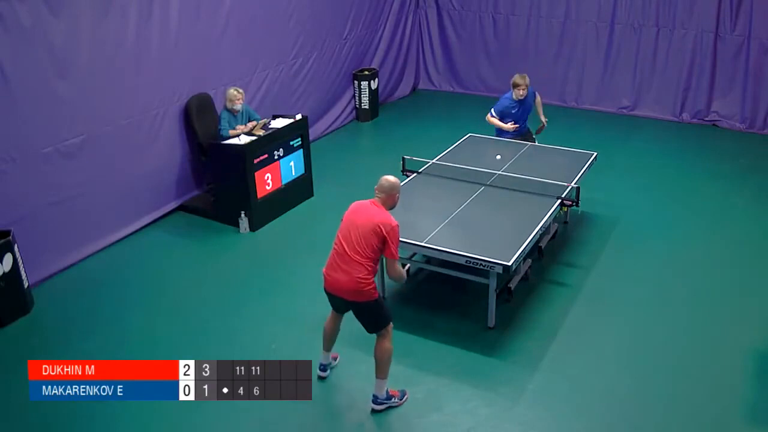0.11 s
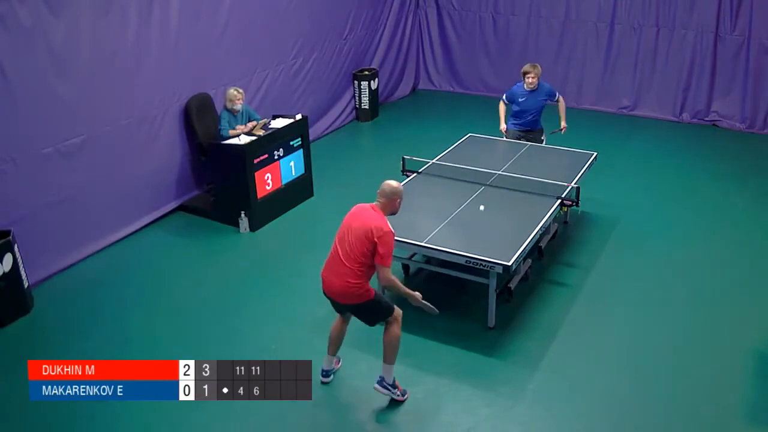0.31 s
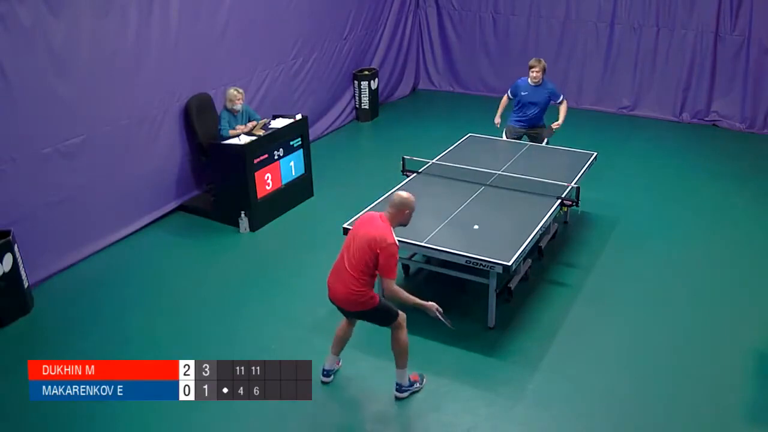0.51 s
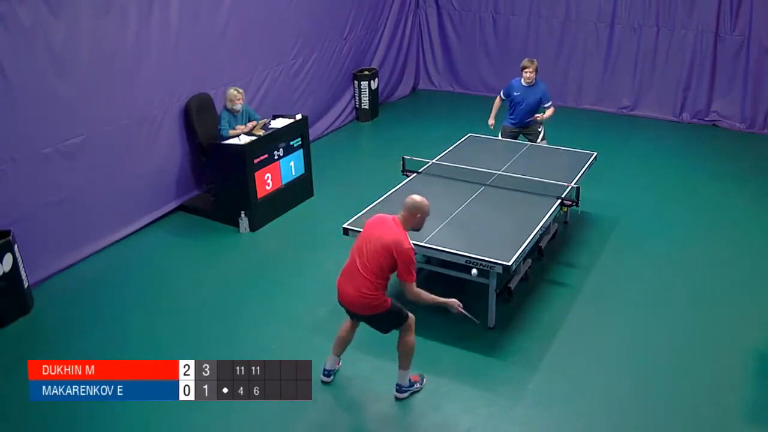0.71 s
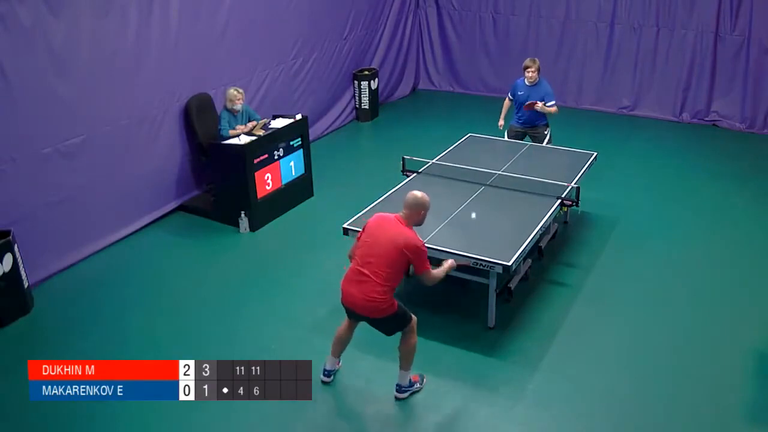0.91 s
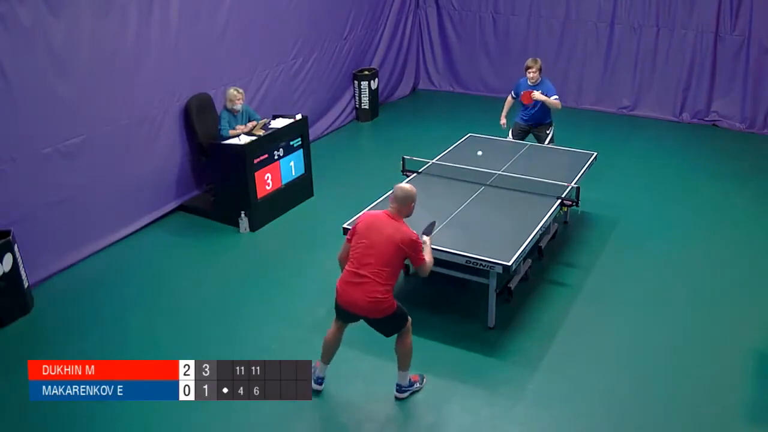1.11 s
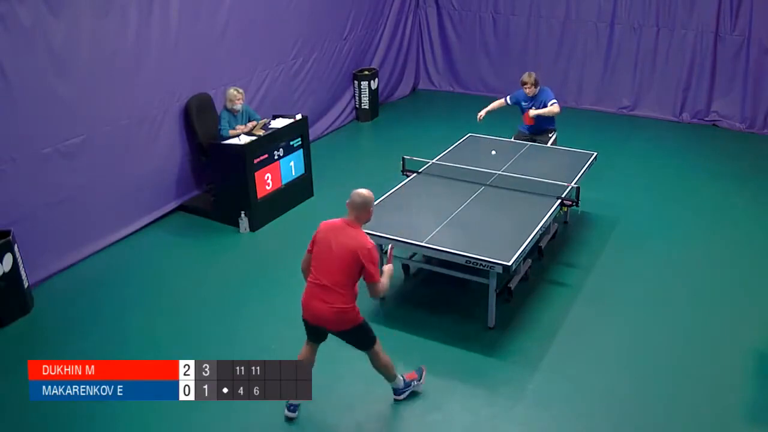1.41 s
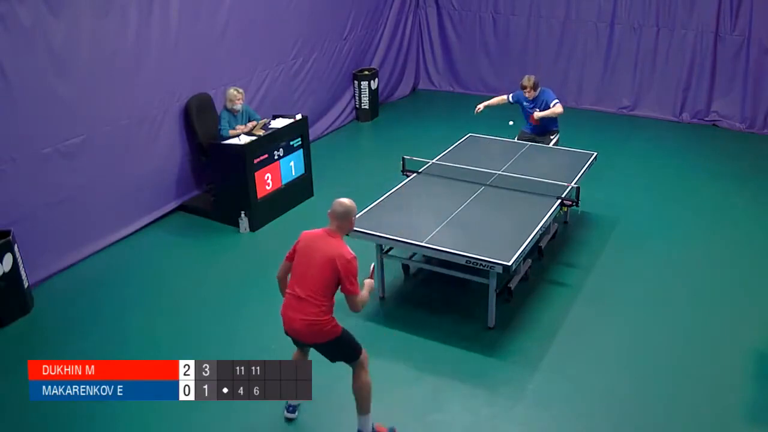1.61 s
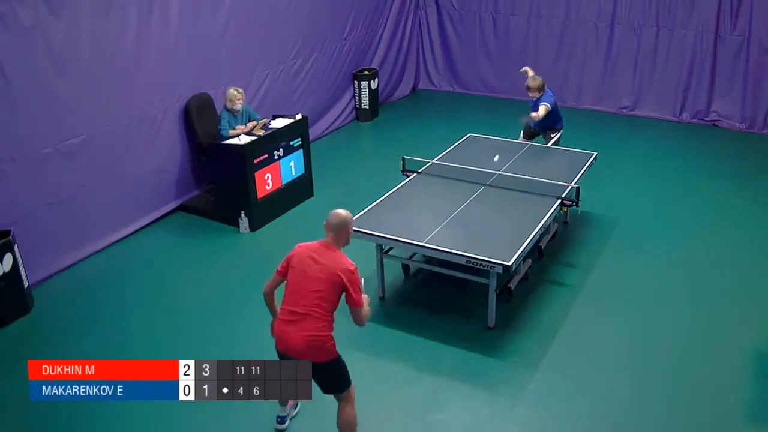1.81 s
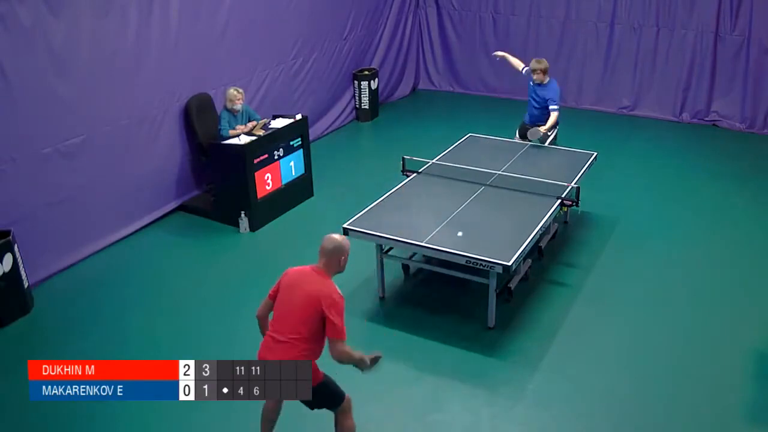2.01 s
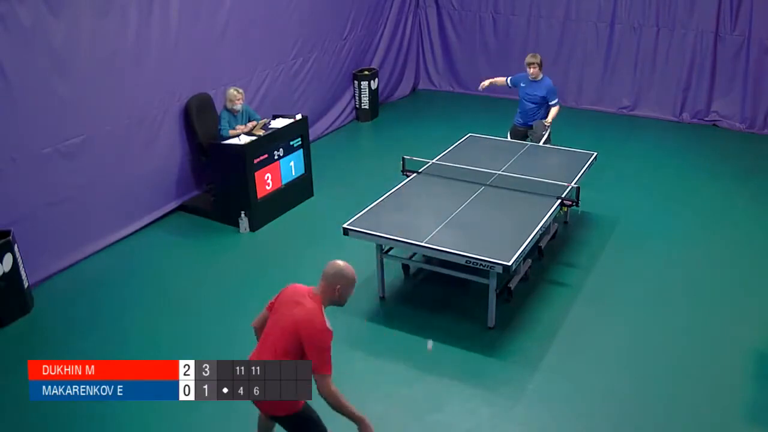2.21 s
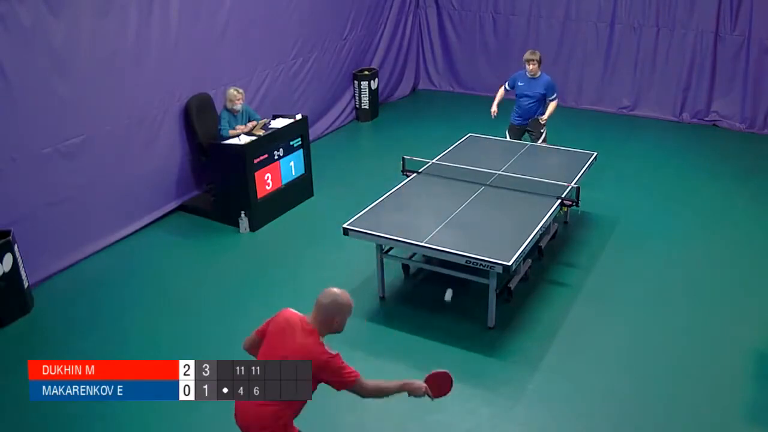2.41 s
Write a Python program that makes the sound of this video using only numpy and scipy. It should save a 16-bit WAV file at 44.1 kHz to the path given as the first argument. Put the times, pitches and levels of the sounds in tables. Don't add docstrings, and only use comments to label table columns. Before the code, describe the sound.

A loud wooden floor thud opens a table tennis rally, followed by light ball clicks, faint steps and brief rubber shoe chirps, strongest late on, all echoing in a hall over low ventilation noise, picked up from afar.

```python
import sys
import numpy as np
from scipy import signal
from scipy.io import wavfile

SR = 44100
rng = np.random.default_rng(int(sys.argv[2]) if len(sys.argv) > 2 else 0)


def decibels_to_gain(level_db):
    exponent = np.asarray(level_db, float) / 20
    return 10 ** exponent


def file_out(sig):
    cols = np.atleast_2d(sig).T
    lim = np.clip(cols, -1, 1)
    pcm = np.round(lim * 32767).astype(np.int16)
    wavfile.write(sys.argv[1], SR, pcm)


N = 112455

# start in seconds, level in dB,
# ring pitch in Hz, ring T60 in seconds, shell crack in dB.
BALL_HITS = [
    (.142, -54, 1185, 0.13, 1),
    (0.694, -34.5, 1036, 0.0067, -6.5),
    (0.71, -49, 1330, 0.0065, -31),
    (1.078, -53, 732, .04, -44.5),
    (1.117, -38, 875, 0.017, -7.5),
    (1.14, -51, 856.7, 0.25, -29.5),
    (1.793, -36.5, 1065, 0.0071, -15.5),
    (1.812, -40.5, 1341, 0.02, -36.5),
    (2.068, -34, 1179, 0.018, 4.5),
    (2.253, -34, 1144, 0.012, 4.5),
]
# start in seconds, level in dB, centre in Hz, cycles rung.
GRIP_TICKS = [
    (.143, -52, 5000, 5),
    (.194, -48, 2600, 5),
    (.776, -42, 6200, 5),
    (.777, -46, 3200, 4),
    (1.119, -47, 5500, 4),
    (1.684, -54, 3500, 40),
    (1.686, -55, 2100, 25),
    (2.53, -50, 6300, 20),
]
# start in seconds, level in dB, slap in dB, boom in dB, tilt of the boards
# in dB per octave (negative is duller).
FOOTFALLS = [
    (.194, -28, -17, -29.5, -1.5),
    (.2, -17, -21.5, -31, -5),
    (.204, -16.5, -6.5, -15.5, 0),
    (0.678, -62, -37, -12, 5),
    (1.682, -41.5, -40, -20, -1.5),
    (1.798, -45, -4.5, -3, -0.5),
    (2.041, -48.5, -59, -21.5, -2),
    (2.257, -39.5, -21, -25, -3),
    (2.332, -39, -49.5, -19.5, -3.5),
]
# pitch in Hz, level in dB, T60 in seconds.
BOARD_MODES = [(157, -7.5, 0.12), (225.7, -6, 0.046), (347.8, -2.5, 0.075), (404, 0.5, 0.036),
               (488.3, -0.5, 0.039), (585, -12.5, .05), (662.4, -12.5, 0.051), (958, -14, 0.015)]
# start in seconds, length in seconds,
# first pitch in Hz, last pitch in Hz, level in dB.
SHRILL_SQUEAKS = [
    (.779, 0.036, 2345, 2263, -65.5),
    (.793, 0.027, 2244, 2420, -57.5),
    (.828, .025, 2350, 2326, -63.5),
    (2.266, 0.016, 2537, 2330, -47),
]
# start in seconds, length in seconds, first and last pitch in Hz, level in dB.
PURE_SQUEAKS = [
    (1.415, 0.012, 3300, 2860, -79.5),
    (1.421, 0.0084, 2930, 2767, -47.5),
    (1.432, 0.022, 2546, 2592, -48),
    (1.44, 0.059, 2778, 2560, -54),
    (1.452, 0.0074, 2612, 2542, -38.5),
    (1.463, 0.026, 2730, 2363, -48.5),
    (2.048, 0.032, 3313, 3175, -39.5),
    (2.238, 0.029, 2843, 2610, -35.5),
    (2.261, 0.0232, 2484, 2385, -33.5),
    (2.528, 0.011, 2625, 2480, -43),
]
# start in seconds, length in seconds, first and last pitch in Hz,
# level in dB.
RELEASE_CHIRP = [
    (2.074, .009, 3013, 2835, -39),
]
# frequency in Hz, T60 in seconds.
HALL_DECAY = [(50, 1.7), (160, 0.52), (420, 0.92), (1100, 0.85), (2400, 1.1), (3300, 1.25), (6000, 0.72)]
# frequency in Hz, level in dB.
HALL_TONE = [(40, -15), (150, 5.5), (500, 2), (1200, 3.5), (3000, 0.5), (7000, 2)]
# delay in seconds, level in dB.
TABLE_WALLS = [(.003, -9), (.045, -11)]
FEET_SCATTER = [(.001, 4.5), (.006, -1.5)]
SOLE_WALLS = [(.071, -7), (.126, -11)]
# frequency in Hz, level in dB per Hz.
HUM_TONE = [(25, -8), (60, -8), (160, -1.5), (280, -11), (640, -18.5), (900, -14.5), (2200, -28.5),
            (6500, -43.5)]


def ball():
    out = np.zeros(N)
    side_t60 = 0.013
    shell = ring(3000, 0.0012)
    for s, db, hz, t60, crack_db in BALL_HITS:
        upper = decibels_to_gain(-3) * ring(hz * 1.42, side_t60)
        lower = decibels_to_gain(-5) * ring(hz * 0.67, side_t60)
        body = ring(hz, t60) - upper - lower
        add(out, s, decibels_to_gain(db) * (body + decibels_to_gain(crack_db) * shell))
    for s, db, hz, cycles in GRIP_TICKS:
        add(out, s, decibels_to_gain(db) * ring(hz, cycles / hz))
    return out


def steps():
    out, t = np.zeros(N), np.arange(30000) / SR
    board_rise_s, boom_rise_s, boom_t60 = 0.001, 0.22, 0.6
    slap_band = signal.butter(1, [700, 1680], "band", fs=SR, output="sos")
    slap = signal.sosfilt(slap_band, 9.8 * (t == 0))
    boom_low = signal.butter(3, 69.4, fs=SR, output="sos")
    rumble = signal.sosfilt(boom_low, rng.standard_normal(len(t)))
    boom = rumble / rumble.std() * decibels_to_gain(-60 * t / boom_t60) * (1 - np.exp(-t / boom_rise_s))
    for s, db, slap_db, boom_db, dull_db in FOOTFALLS:
        boards = np.zeros(len(t))
        for k, (hz, mode_db, t60) in enumerate(BOARD_MODES):
            octaves = np.log2(hz / BOARD_MODES[0][0])
            mode = ring(hz, t60 * decibels_to_gain(dull_db), size=len(t))
            boards += (-1) ** k * decibels_to_gain(mode_db + dull_db * octaves) * mode
        boards *= (1 - np.exp(-t / board_rise_s)) / 2
        add(out, s, decibels_to_gain(db) * (boards + decibels_to_gain(slap_db) * slap + decibels_to_gain(boom_db) * boom))
    return out


def squeaks(rows, overtones_db):
    edge_s, wobble_per_s = 0.004, 220
    out, pitch, level = np.zeros(N), drift(wobble_per_s), drift(wobble_per_s)
    rasp = 0.05 * drift(1200)
    scuff = decibels_to_gain(-33) * np.diff(rng.standard_normal(N + 1))
    second, third = decibels_to_gain(overtones_db)
    for s, length, first_hz, last_hz, db in rows:
        i = np.arange(int(s * SR), min(N, int((s + length + edge_s) * SR)))
        t = i / SR - s
        glide_hz = first_hz + (last_hz - first_hz) * t / length
        phase = 2 * np.pi * np.cumsum(glide_hz * (1 + 0.005 * pitch[i])) / SR
        tone = np.sin(phase) + second * np.sin(2 * phase) + third * np.sin(3 * phase)
        nearest_end = np.minimum(t, length + edge_s - t)
        shape = np.sin(np.pi / 2 * np.clip(nearest_end / edge_s, 0, 1)) ** 2
        strength = decibels_to_gain(db + 1.8 * level[i])
        out[i] += strength * shape * (tone * (1 + rasp[i]) + scuff[i])
    return out


def ring(hz, t60, size=12000):
    t = np.arange(size) / SR
    return np.sin(2 * np.pi * hz * t) * decibels_to_gain(-60 * t / t60)


def drift(rate):
    r = np.exp(-2 * np.pi * rate / SR)
    slow = signal.lfilter([1], [1, -2 * r, r * r], rng.standard_normal(N + SR))[SR:]
    return slow / slow.std()


def add(out, s, sound):
    i = int(s * SR)
    out[i:i + len(sound)] += sound[:len(out) - i]


def at_hz(points, hz):
    table = np.array(points)
    return np.interp(np.log(hz), np.log(table[:, 0]), table[:, 1])


def bands(size):
    edges = 20 * 2 ** np.arange(0, 9.1, .5)
    white = rng.standard_normal((2, size + 4000))
    result = []
    for k, (low, high) in enumerate(zip(edges, edges[1:])):
        band = signal.butter(2, [low, high], "band", fs=SR, output="sos")
        noise = signal.sosfilt(band, white[k % 2])[4000:]
        result.append((np.sqrt(low * high), noise))
    return result


def hall(x, tail_db, build_s, echoes):
    t = np.arange(2 * SR) / SR
    tail = np.zeros(len(t))
    for hz, noise in bands(len(t)):
        tail += noise * decibels_to_gain(at_hz(HALL_TONE, hz) - 60 * t / at_hz(HALL_DECAY, hz))
    response = decibels_to_gain(tail_db) * tail * (1 - np.exp(-t / build_s))
    response[0] += 1
    for s, db in echoes:
        smear = rng.standard_normal(800) * np.exp(-t[:800] / 0.002)
        add(response, s, decibels_to_gain(db) * smear / np.sqrt(np.sum(smear ** 2)))
    return signal.fftconvolve(x, response)[:N]


def hum():
    out = np.zeros(N)
    for hz, noise in bands(N):
        out += noise * decibels_to_gain(at_hz(HUM_TONE, hz) + 1.5 * drift(3.76))
    return decibels_to_gain(-55.5) * out / out.std()


def scene():
    soles = squeaks(SHRILL_SQUEAKS, (-2, -22))
    soles += squeaks(PURE_SQUEAKS, (-18, -18.5))
    soles += squeaks(RELEASE_CHIRP, (-5.5, -38))
    mix = hall(ball(), -30, 0.003, TABLE_WALLS)
    mix += hall(steps(), -25, 0.0062, FEET_SCATTER)
    mix += hall(soles, -35.5, 0.025, SOLE_WALLS)
    return (mix + hum())[None]


def top_cut(x):
    return signal.sosfilt(signal.butter(12, 9000, fs=SR, output="sos"), x)


def record(dry):
    steep = signal.butter(14, 7050, fs=SR, output="sos")
    soft = signal.butter(2, 6500, fs=SR, output="sos")
    x = signal.sosfilt(soft, signal.sosfilt(steep, dry))
    x = x + decibels_to_gain(-100) * rng.standard_normal(x.shape)
    return top_cut(x)


dry = scene()
out = record(dry)
file_out(out)
```